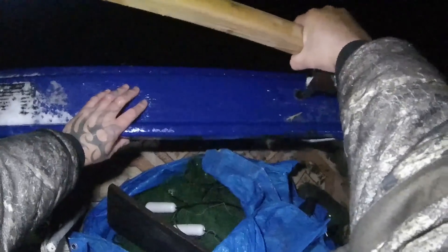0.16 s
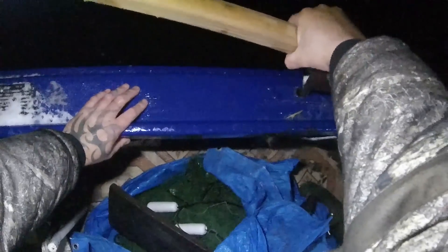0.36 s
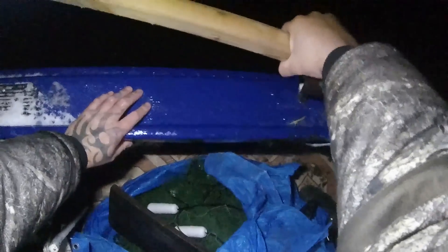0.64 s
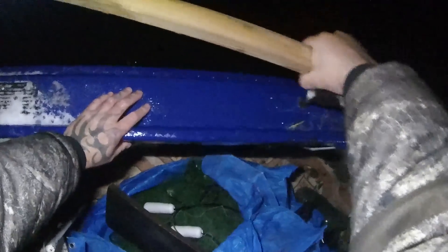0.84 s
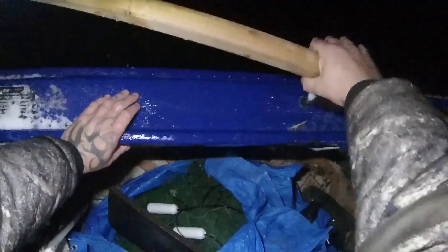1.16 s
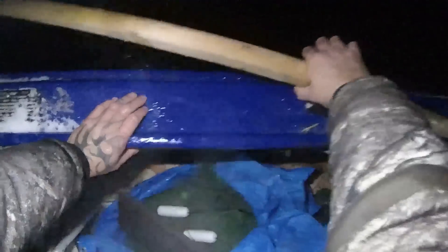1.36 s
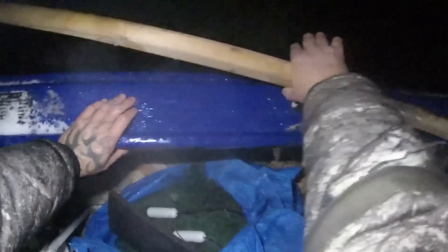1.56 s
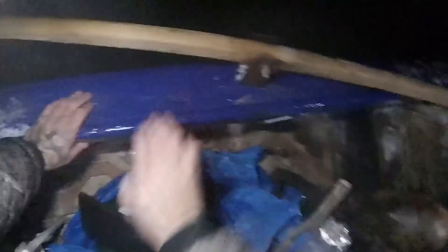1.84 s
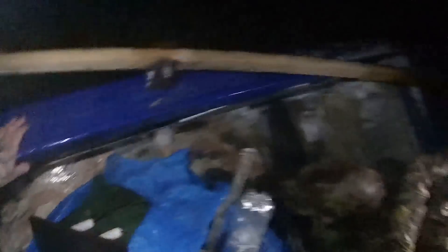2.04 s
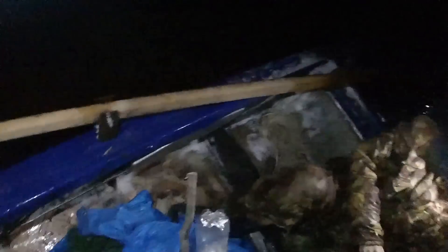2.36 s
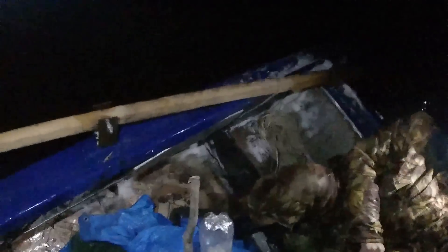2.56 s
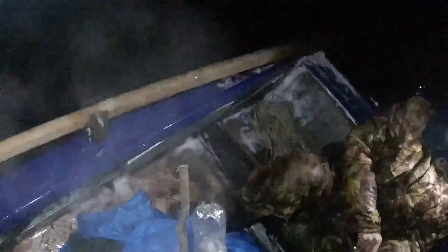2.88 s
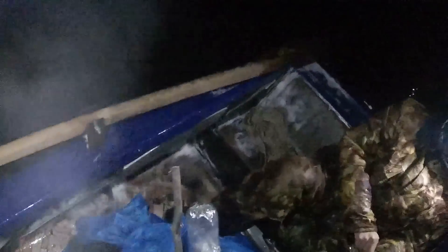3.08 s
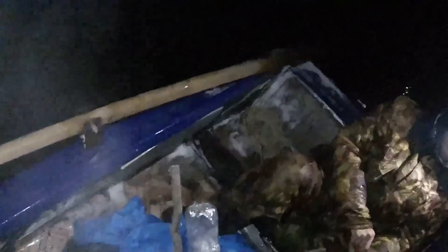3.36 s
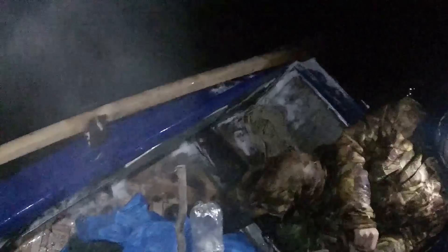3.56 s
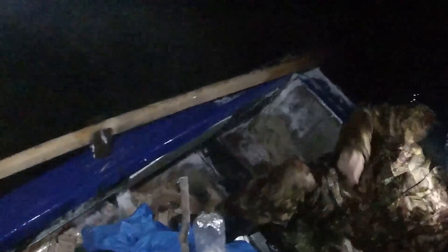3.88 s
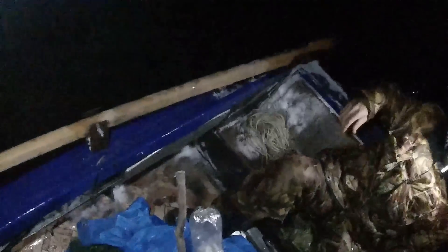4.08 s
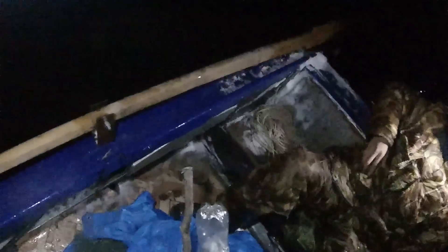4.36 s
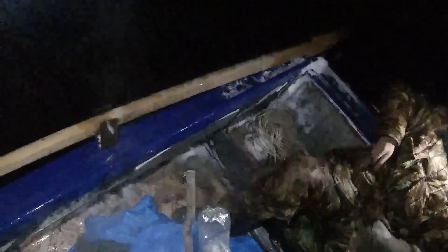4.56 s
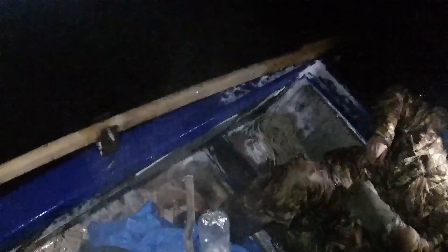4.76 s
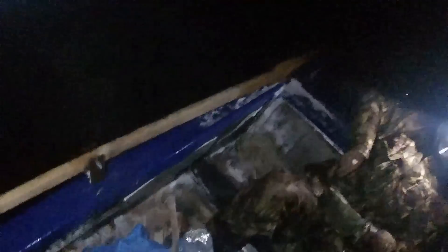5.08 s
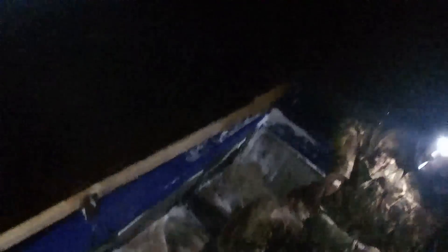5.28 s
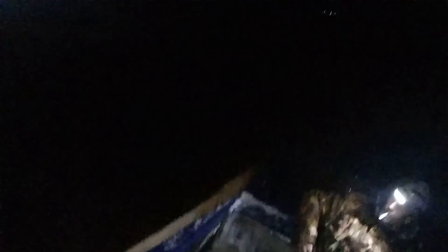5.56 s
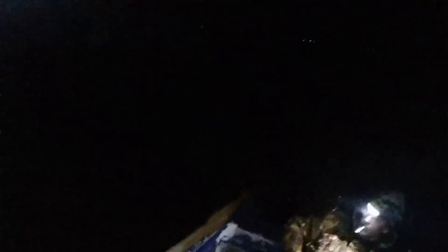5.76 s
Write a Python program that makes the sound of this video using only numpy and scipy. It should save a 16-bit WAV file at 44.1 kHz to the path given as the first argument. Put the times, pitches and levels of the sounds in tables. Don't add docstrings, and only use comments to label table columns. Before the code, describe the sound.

Close up in a small boat at night, water laps faintly under a hollow hull. Light ticks and a metal pin clink lead into dry oar rubbing and knocks, then one very loud wooden crack as the oar drops into place. Sparse soft bumps follow, then a burst of knocking and rattling near the end.

```python
import sys
import numpy as np
from scipy import signal
from scipy.fft import rfft, irfft, next_fast_len
from scipy.io import wavfile
from scipy.ndimage import uniform_filter1d

SR = 44100
rng = np.random.default_rng(int(sys.argv[2]) if len(sys.argv) > 2 else 0)


def makeup_ratio(level_db):
    decades = np.asarray(level_db, float) / 20
    return 10 ** decades


def unload_audio(sound):
    columns = np.transpose(np.atleast_2d(sound))
    steps = np.round(np.clip(columns, -1, 1) * 32767)
    wavfile.write(sys.argv[1], SR, steps.astype(np.int16))


N = 261557

# (frequency [Hz], density [dB per Hz])
AIR_SPECTRUM = [(400, -6), (520, 3), (800, 0), (1600, -2), (2500, -4), (4000, -7), (6300, -11),
                (8500, -13.5), (13000, -15.5), (15000, -16), (16000, -24)]
# (frequency [Hz], density [dB per Hz])
HISS_SPECTRUM = [(180, -60), (300, -12.5), (528, -6), (1530, -11), (1720, -11), (2480, -9), (2790, -9.5),
                 (3950, -5), (14500, -5), (16000, -33)]
# (time [s], level [dB])
ROCKING = [(0, -0.5), (.8, -2), (1.17, 9), (1.45, 2), (1.75, -1.5), (2.28, 1), (2.6, 1.5), (2.96, -0.5),
           (3.24, 2.5), (3.65, 1.5), (4.2, 0), (4.7, 0.5), (5, 6.5), (5.13, 18), (5.28, 0), (5.85, 3),
           (5.93, -2)]
# (frequency [Hz], density [dB per Hz])
LAPPING_SPECTRUM = [(110, -48.5), (140, -16), (190, -10), (235, -6.5), (262, -8), (284, 0), (306, -11),
                    (345, -13), (410, -13), (460, -24), (560, -24.5), (700, -30.5)]
# (frequency [Hz], density [dB per Hz])
SWELL_SPECTRUM = [(14, -9), (24, 4.5), (34, -1.5), (48, 2), (64, -1.5), (100, -5), (125, -5), (170, -19.5),
                  (220, -29.5)]
# (time [s], peak [dB], start [Hz], end [Hz], length [s])
BUBBLES = [
    (3.405, -53, 480, 1350, .058),
    (.77, -54, 780, 900, .03),
]
# (frequency [Hz], level [dB])
HULL_MODES = [(98, -15.5), (140, -3.5), (186, 6), (232, 2.5), (288, 1), (340, 1), (405, 3.5), (462, 2.5),
              (522, 13.5), (645, -1), (780, 9), (940, 9.5)]
# (frequency [Hz], level [dB])
PIN_MODES = [(1200, -7), (1435, -4), (1780, -4), (2070, -6), (2280, 11.5), (2530, 15), (2730, 14),
             (3000, 11), (3600, -1), (3900, -20), (4280, -8), (5200, -5.5), (5900, 20.5), (6750, 14),
             (7500, -12.5)]
# (time [s], strength [dB], hardness [dB per mode group])
BUMPS = [(0.456, -48.5, -11.5), (0.66, -44, -9), (.759, -44.5, -6), (.902, -52, 5), (1.831, -54, 6),
         (2.079, -45, -6.5), (2.162, -41.5, -6), (2.217, -42.5, -0.5), (2.517, -41.5, -9.5),
         (3.514, -52, 4), (3.942, -44, 5), (4.269, -51, -3.5), (4.337, -51, -12.5), (4.667, -41.5, -4.5),
         (5.298, -51.5, 0), (5.742, -44.5, -2)]
# (time [s], strength [dB], hardness [dB per mode group])
SOFT_TICKS = [(.8415, -52, -1), (.9044, -56, -7), (1.845, -52, -2.5), (2.157, -50, 1), (2.213, -47.5, -1.5),
              (2.763, -58, -10), (3.792, -55, -5), (5.2974, -49, -2), (5.708, -52, -2), (5.747, -46, -2)]
# (time [s], strength [dB], hardness [dB per mode group])
TICKS = [(1.1819, -39, -2.5), (1.1929, -40.5, 1), (1.2894, -35.5, -1), (1.5015, -26.5, -2), (2.56, -48, 4),
         (3.05, -38, -2.5), (3.057, -40.5, 6.5), (3.0692, -42, -3.5), (3.2183, -45.5, 3), (3.2307, -39, 0),
         (3.676, -51.5, -5), (3.9419, -40.5, -2), (4.6678, -43, -2.5), (4.9495, -32.5, -1),
         (4.9647, -39.5, 2.5), (4.9821, -48.5, 6), (4.9993, -39, 1.5), (5.01, -51, 5), (5.025, -54.5, -6),
         (5.0664, -46, -6.5), (5.0749, -38, -1), (5.099, -49.5, 3), (5.1224, -49.5, -11),
         (5.136, -36.5, -1.5), (5.146, -38.5, 0.5)]
# (time [s], strength [dB], hardness [dB per mode group])
CLINKS = [(0.092, -42, 4.5), (0.1649, -55.5, -0.5), (0.4824, -61.5, 3), (1.076, -45.5, 2.5),
          (1.087, -43.5, 0.5), (1.1094, -27.5, 0.5), (1.2223, -34, -0.5), (1.512, -27.5, 1),
          (1.6789, -57, -3), (2.512, -53.5, 3), (4.228, -54.5, 1), (4.942, -40, -4)]
# (time [s], strength [dB], hardness [dB per mode group])
THUDS = [(.997, -39.5, -3), (1.025, -35, -5), (1.037, -42.5, 2.5), (1.083, -34.5, -4.5),
         (1.183, -29.5, 3.5), (1.221, -25, -4.5), (1.226, -37.5, -4), (1.282, -30, -4.5), (1.502, -21.5, 5),
         (1.535, -29.5, -4.5), (1.599, -39.5, -10.5), (2.555, -40, -5.5), (3.056, -34.5, 0.5),
         (3.085, -47.5, -16), (3.236, -32, -2.5), (4.942, -20.5, -2), (4.964, -24.5, -6.5),
         (4.969, -31.5, -8.5), (5.023, -37.5, 1.5), (5.068, -23.5, 3), (5.073, -29, -3), (5.122, -29, 6.5),
         (5.131, -31.5, 4), (5.151, -30.5, 0), (5.177, -39.5, -8.5)]
# (time [s], peak [dB], frequency [Hz])
LONE_RINGS = [(.049, -52, 1590), (.079, -54, 1387), (0.094, -35.5, 4200), (0.899, -49, 1208),
              (1.078, -44.5, 6520), (1.087, -47.5, 6430), (1.1095, -44, 10400), (1.223, -56.5, 10200),
              (1.228, -31, 186.5), (1.471, -15, 637.4), (1.4715, -42, 10000), (1.5115, -49.5, 10300),
              (2.513, -50, 791), (2.575, -40.5, 106.6), (2.842, -46.5, 616.5), (3.068, -36.5, 2920),
              (3.238, -34.5, 515.7), (3.792, -54, 1264), (4.275, -52, 716), (4.944, -27.5, 601.5),
              (4.946, -51, 7500), (4.9491, -31.5, 4034), (4.95, -45, 6710), (4.964, -30, 190.9),
              (4.9988, -35.5, 4050), (4.9995, -50.5, 6580), (5.069, -54, 6600), (5.134, -34, 4077),
              (5.135, -53.5, 6390), (5.147, -60.5, 6700), (5.151, -35, 185.6)]
# (start [s], length [s], pressure [dB], treble against it [dB])
RUBS = [(0.67, 0.19, -58, -13.5), (0.861, 0.101, -56, -9), (0.981, 0.097, -52, -5),
        (1.048, 0.1109, -48.5, -4), (1.13, 0.218, -52, -5), (1.35, 0.0843, -51, -6.5),
        (1.411, 0.0825, -51.5, 0), (2.03, .27, -62, -25), (2.467, 0.0996, -60, -0.5),
        (3.052, 0.121, -57, -4), (3.158, 0.124, -51.5, -8), (3.499, 0.078, -58.5, -6.5),
        (4.162, 0.117, -61, 3), (4.259, 0.087, -59.5, -22), (4.919, 0.1408, -48, -6),
        (5.045, 0.157, -54.5, -4.5)]
# (frequency [Hz], density [dB per Hz])
RUB_SPECTRUM = [(210, -53), (350, -11.5), (406, -12.5), (485, -13.5), (983, -19), (1500, -22),
                (2190, -24.5), (9000, -50), (11700, -92.5), (19800, -120)]
# (frequency [Hz], level [dB], t60 [s])
SHAFT_MODES = [(294.7, -7.5, 0.35), (405, -2.5, 0.14), (528.5, 6, 0.14), (570, -23.5, 0.18),
               (656.2, -1.5, 0.078), (737, -0.5, 0.037), (830, 1.5, 0.0264), (1015, -21.5, 0.14),
               (1220, 11.5, 0.0337), (1380, -4, 0.1), (1624, -14.5, 0.023), (1956, -3.5, 0.036),
               (2026, 3, 0.038), (2184, 1, 0.037), (2361, -9.5, 0.0394), (2763, 11, 0.0315),
               (3160, -3.5, 0.029), (3257, 1, 0.0096), (3637, 7, 0.0297), (3820, -3.5, 0.0312),
               (4200, -2.5, 0.039), (5890, 1.5, 0.014), (6623, 3.5, 0.014)]
# (frequency [Hz], level [dB], t60 [s])
BOOM_MODES = [(64, -23.5, 0.83), (92.98, -23.5, 0.66), (126.8, -25, .6), (162.4, -18, .45),
              (235.4, -16, 0.29), (298.5, -17, 0.17)]
# (frequency [Hz], density [dB per Hz])
CRACK_SPECTRUM = [(150, -1), (300, 23), (600, 11), (1500, -17.5), (2800, 1.5), (4200, -17), (5200, -17),
                  (6700, -29), (8000, -20), (12000, -39), (16000, -29)]


def evened(x):
    return x / np.sqrt(np.mean(x ** 2) + 1e-20)


def coloured(x, spectrum):
    size = next_fast_len(len(x))
    hz = np.fft.rfftfreq(size, 1 / SR)
    points_hz, points_db = np.transpose(spectrum)
    gain_db = np.interp(np.log(hz + 1), np.log(points_hz + 1), points_db, -99, -99)
    return evened(irfft(rfft(x, size) * makeup_ratio(gain_db), size)[:len(x)])


def lumps(width_s, depth_db):
    size = round(width_s * SR)
    wander = uniform_filter1d(uniform_filter1d(rng.standard_normal(N), size), size)
    return evened(makeup_ratio(depth_db * evened(wander)))


def lumpy_noise(width_s, depth_db):
    return rng.standard_normal(N) * lumps(width_s, depth_db)


def add(mix, start_s, peak_db, sound):
    part = mix[round(start_s * SR):][:len(sound)]
    part += makeup_ratio(peak_db) * sound[:len(part)] / abs(sound).max()


def ring(hz, db, t60_s, rise_s, detune=0.0513):
    t = np.arange(round(1.2 * np.max(t60_s) * SR) + 400) / SR
    pitch_draw, phase_draw = rng.uniform(-1.061, 1, (2, len(hz), 1))
    decay = makeup_ratio(db[:, None] - 60 * t / t60_s[:, None])
    phase = 2 * np.pi * hz[:, None] * (1 + detune * pitch_draw) * t + 1.287 * phase_draw
    return (decay * np.sin(phase)).sum(0) * (1 - np.exp(-t / rise_s))


def rattle(t, low_hz, high_hz, t60_s, rise_s):
    noise = rng.standard_normal(14000)[:len(t)]
    noise = noise * makeup_ratio(-60 * t / t60_s) * (1 - np.exp(-t / rise_s))
    band = signal.butter(4, [low_hz, high_hz], "band", fs=SR, output="sos")
    return evened(signal.sosfilt(band, noise))


def blows(mix, rows, modes, edges_hz, lean, group_db, t60_s, rise_s, grit):
    hz, db = np.transpose(modes)
    for start_s, strength_db, hardness_db in rows:
        peaks_db = strength_db + np.add(group_db, np.multiply(lean, hardness_db))
        for low_hz, high_hz, peak_db in zip(edges_hz, edges_hz[1:], peaks_db):
            group = (hz > low_hz) & (hz < high_hz)
            mode_t60_s = t60_s * (edges_hz[1] / hz[group]) ** 0.64
            tone = evened(ring(hz[group], db[group], mode_t60_s, rise_s))
            t = np.arange(len(tone)) / SR
            rattle_t60_s = t60_s / (high_hz / edges_hz[1]) ** 0.072
            add(mix, start_s, peak_db, tone + grit * rattle(t, low_hz, high_hz, rattle_t60_s, rise_s))


def night_air():
    return makeup_ratio(-60.5) * coloured(lumpy_noise(0.027, 0.157), AIR_SPECTRUM)


def lapping():
    rock_db = np.interp(np.arange(N) / SR, *np.transpose(ROCKING))
    hollow = coloured(lumpy_noise(0.01034, 1.31), LAPPING_SPECTRUM)
    swell = coloured(lumpy_noise(.04, 1.5), SWELL_SPECTRUM)
    return makeup_ratio(-52 + rock_db) * hollow + makeup_ratio(-53.5 + 0.996 * rock_db) * swell


def bubbles(mix):
    wobble = 1 + .05 * evened(uniform_filter1d(rng.standard_normal(4000), 200))
    for start_s, peak_db, start_hz, end_hz, length_s in BUBBLES:
        glide_hz = np.geomspace(start_hz, end_hz, round(length_s * SR))
        phase = 2 * np.pi * np.cumsum(glide_hz * wobble[:len(glide_hz)]) / SR
        add(mix, start_s, peak_db, np.sin(phase) * signal.windows.tukey(len(glide_hz), .6))


def lone_rings(mix):
    for start_s, peak_db, hz in LONE_RINGS:
        t60_s = 0.1314 * (500 / hz) ** 0.854
        tone = ring(np.array([hz]), np.array([0]), np.array([t60_s]), rise_s=0.343 / hz, detune=0)
        add(mix, start_s, peak_db, tone)


def rubbing():
    grains = lumpy_noise(0.0021, 2.33)
    dull = coloured(grains, [p for p in RUB_SPECTRUM if p[0] < 1800])
    bright = coloured(grains, [p for p in RUB_SPECTRUM if p[0] > 1200])
    pressure, treble = np.zeros((2, N))
    for start_s, length_s, pressure_db, treble_db in RUBS:
        stroke = signal.windows.tukey(round(length_s * SR), .6)
        add(pressure, start_s, pressure_db, stroke)
        add(treble, start_s, pressure_db + treble_db, stroke)
    return pressure * dull + treble * bright


def pin_blows(mix):
    pin = PIN_MODES, (1100, 2150, 4700, 8000), (-1, 1, 0)
    blows(mix, CLINKS, *pin, group_db=(3.54, 5.24, -4), t60_s=.03, rise_s=0.000135, grit=0.785)
    blows(mix, TICKS, *pin, group_db=(0.92, 2.81, -22), t60_s=0.0443, rise_s=0.000167, grit=0.497)
    blows(mix, SOFT_TICKS, *pin, group_db=(0, 0, -16), t60_s=.042, rise_s=0.00042, grit=0.56)


def hull_blows(mix):
    hull = HULL_MODES, (80, 260, 480, 1100), (-1, 0, 1)
    blows(mix, THUDS, *hull, group_db=(-2.26, 0.47, -0.65), t60_s=0.1105, rise_s=0.000692, grit=1.036)
    blows(mix, BUMPS, *hull, group_db=(-1.44, -0.5, 1.76), t60_s=0.1355, rise_s=0.00038, grit=2.11)


def landing(mix):
    drop_s, drop_db = 1.4705, .3
    rebound_s, rebound_db = .0013, -4.5
    tone = ring(*np.transpose(SHAFT_MODES), rise_s=0.0008, detune=0)
    t = np.arange(len(tone)) / SR
    noise = coloured(rng.standard_normal(len(t)), CRACK_SPECTRUM)
    dulled = signal.sosfilt(signal.butter(2, 5500, fs=SR, output="sos"), noise)
    crack = noise * makeup_ratio(-60 * t / 0.0083) + dulled * makeup_ratio(-6.5 - 60 * t / 0.0637)
    crack *= 1 - np.exp(-t / 0.00028)
    add(mix, drop_s, drop_db, tone / abs(tone).max() + 1.365 * crack / abs(crack).max())
    add(mix, drop_s + rebound_s, drop_db + rebound_db, crack)
    add(mix, drop_s, -19, ring(*np.transpose(BOOM_MODES), rise_s=0.03, detune=0))


def scene():
    mix = np.zeros(N)
    hull_blows(mix)
    pin_blows(mix)
    lone_rings(mix)
    landing(mix)
    mix += night_air()
    bubbles(mix)
    mix += lapping()
    mix += rubbing()
    return np.array([mix, mix])


def low_pass(x):
    return signal.sosfilt(signal.butter(12, 15330, fs=SR, output="sos"), x)


def record(dry):
    hiss = makeup_ratio(-72) * coloured(rng.standard_normal(N), HISS_SPECTRUM)
    heard = signal.sosfilt(signal.butter(2, 45, "high", fs=SR, output="sos"), dry)
    whine_hz, whine_db = 9650, -93
    whine = makeup_ratio(whine_db) * np.sin(2 * np.pi * whine_hz * np.arange(N) / SR)
    mix = np.clip(heard + whine + np.array([hiss, -hiss]), -.98, .98)
    return low_pass(mix)


dry = scene()
out = record(dry)
unload_audio(out)
```